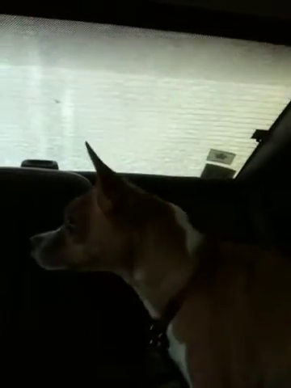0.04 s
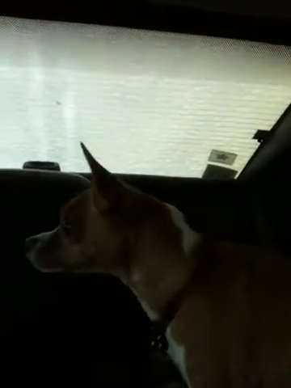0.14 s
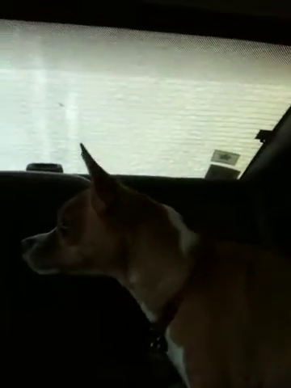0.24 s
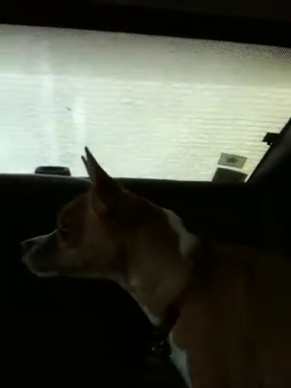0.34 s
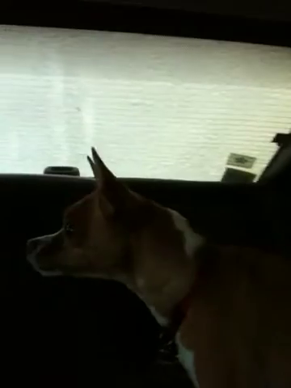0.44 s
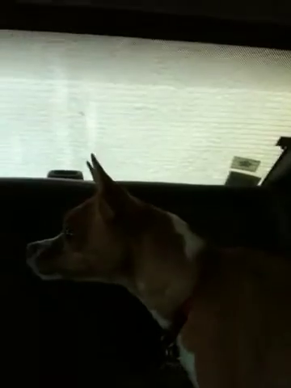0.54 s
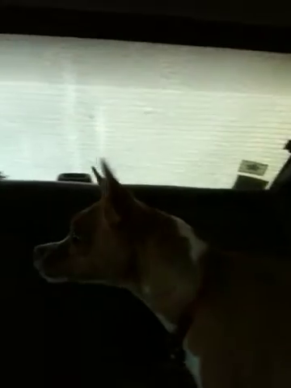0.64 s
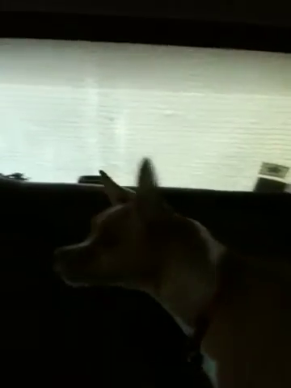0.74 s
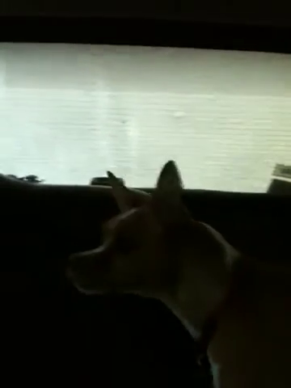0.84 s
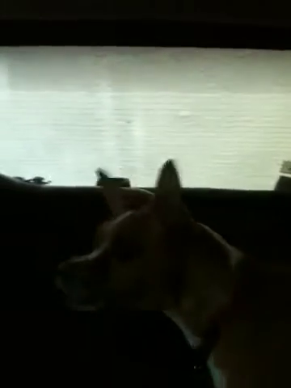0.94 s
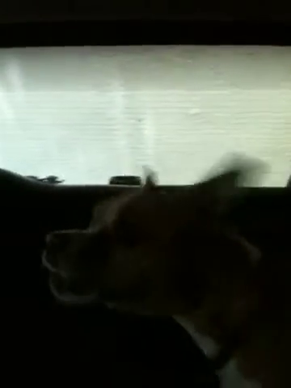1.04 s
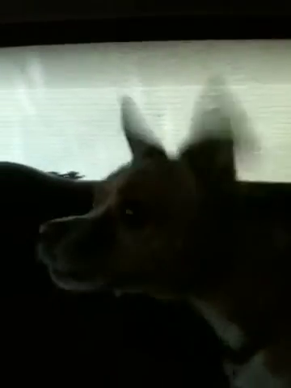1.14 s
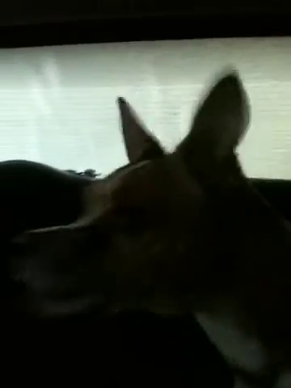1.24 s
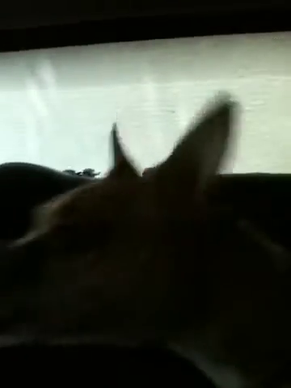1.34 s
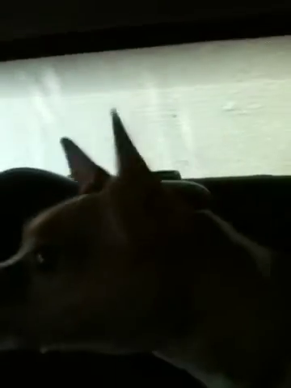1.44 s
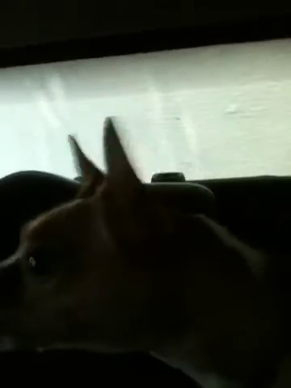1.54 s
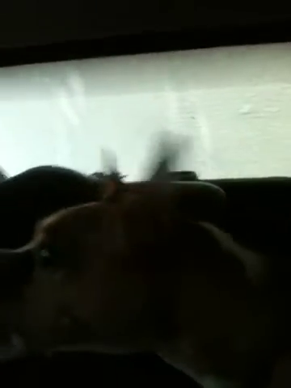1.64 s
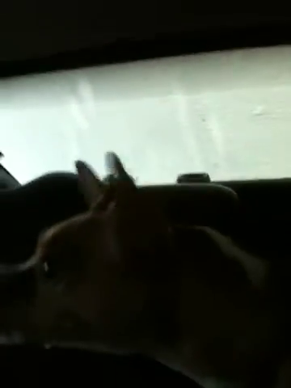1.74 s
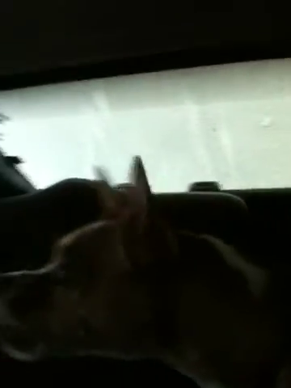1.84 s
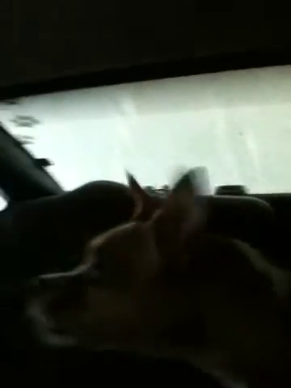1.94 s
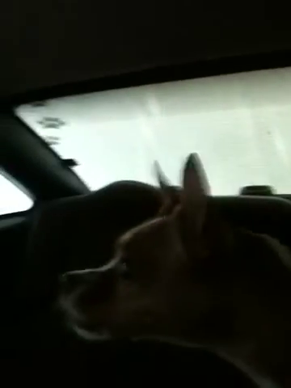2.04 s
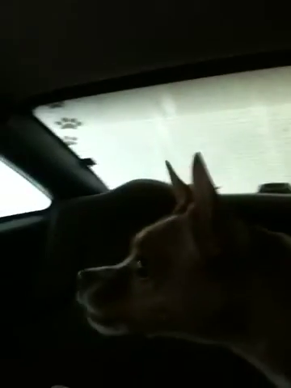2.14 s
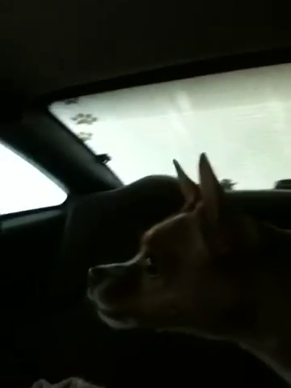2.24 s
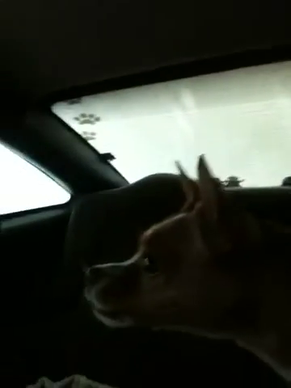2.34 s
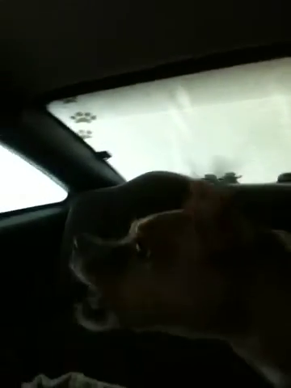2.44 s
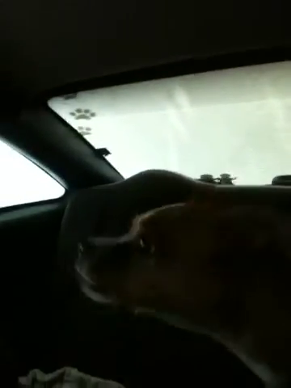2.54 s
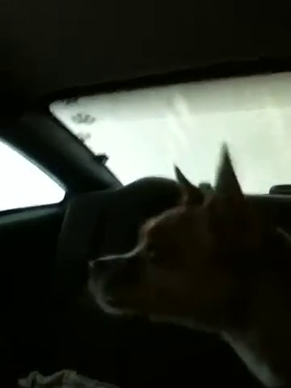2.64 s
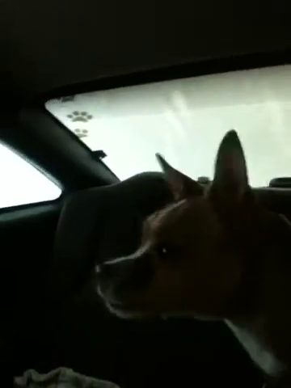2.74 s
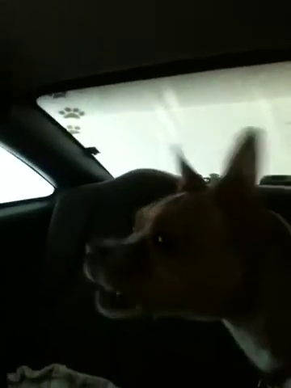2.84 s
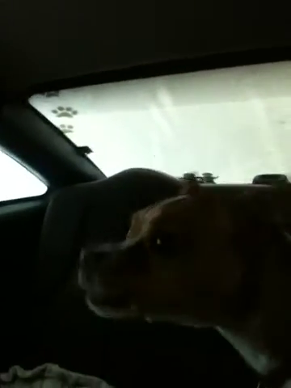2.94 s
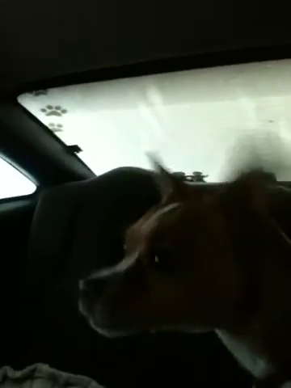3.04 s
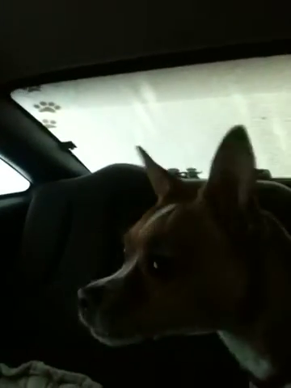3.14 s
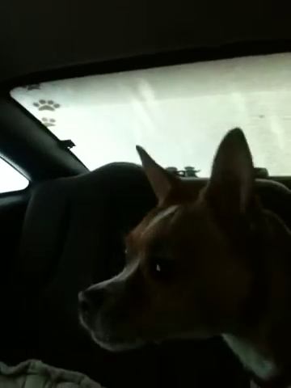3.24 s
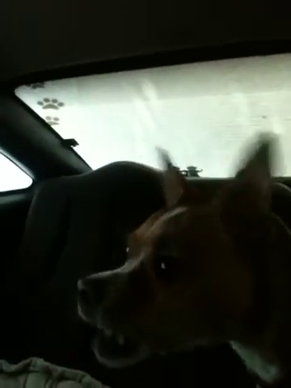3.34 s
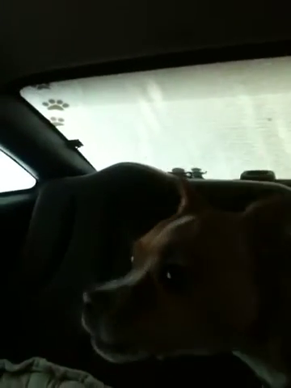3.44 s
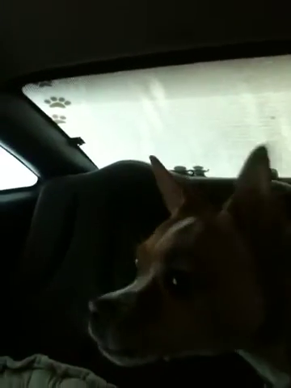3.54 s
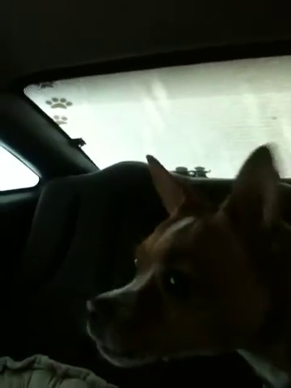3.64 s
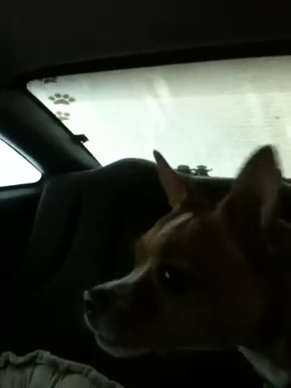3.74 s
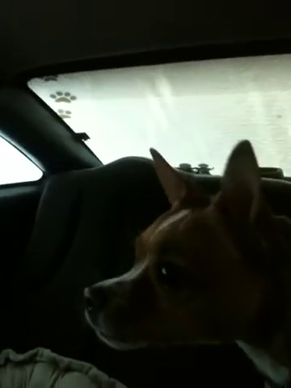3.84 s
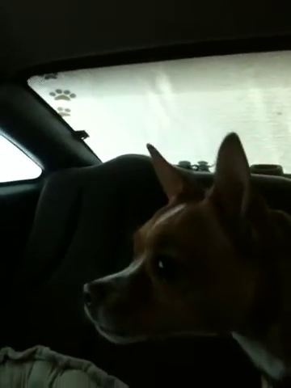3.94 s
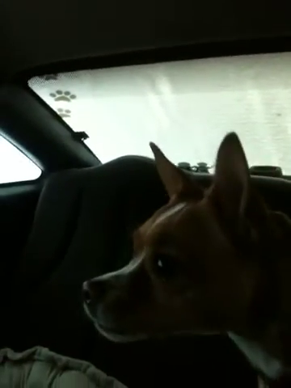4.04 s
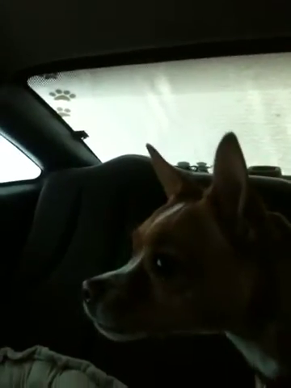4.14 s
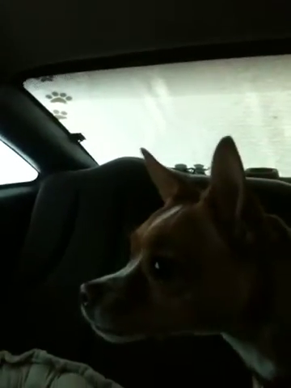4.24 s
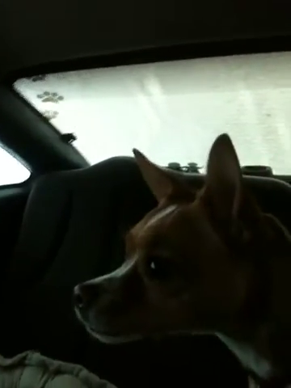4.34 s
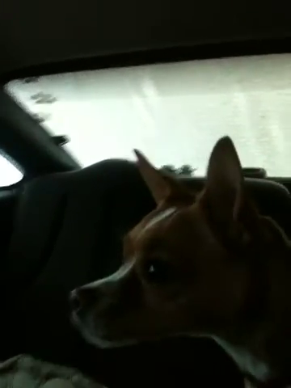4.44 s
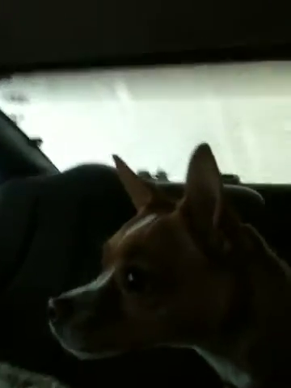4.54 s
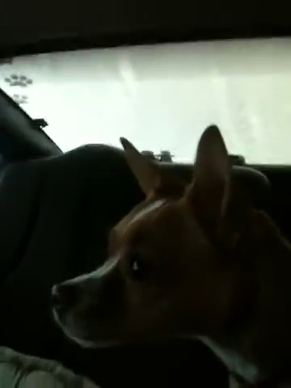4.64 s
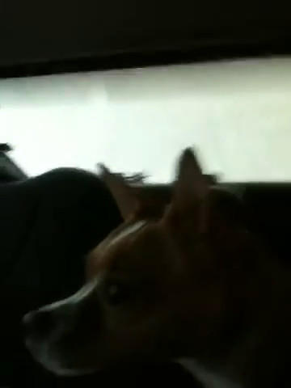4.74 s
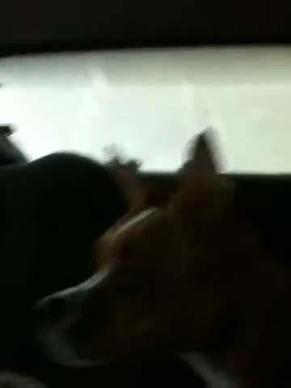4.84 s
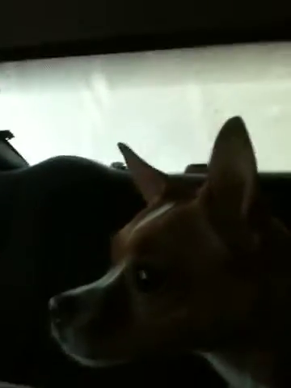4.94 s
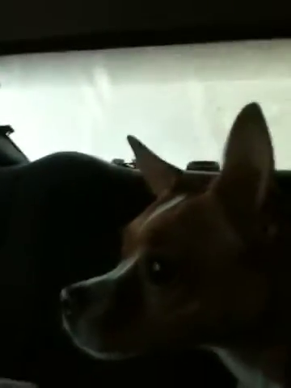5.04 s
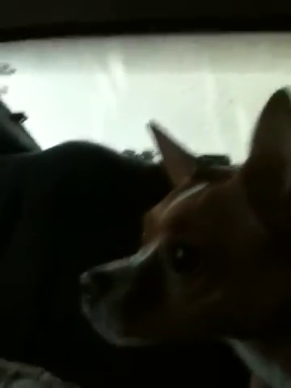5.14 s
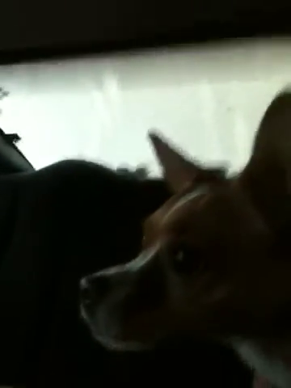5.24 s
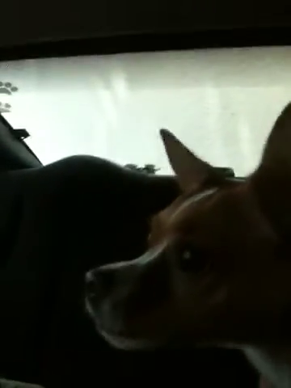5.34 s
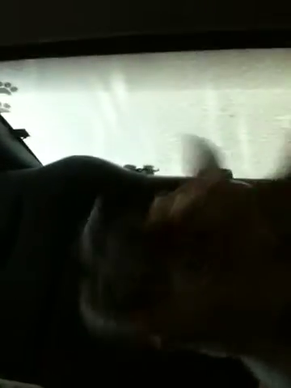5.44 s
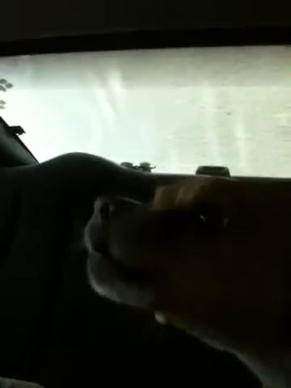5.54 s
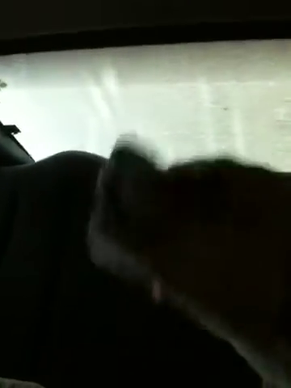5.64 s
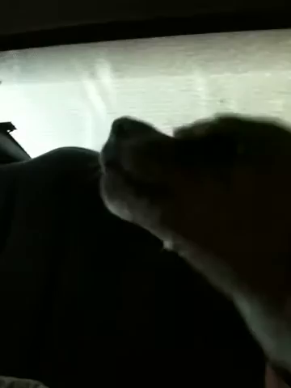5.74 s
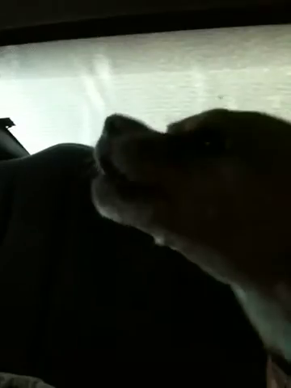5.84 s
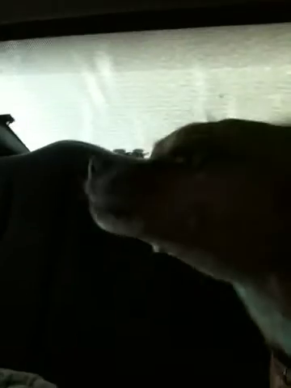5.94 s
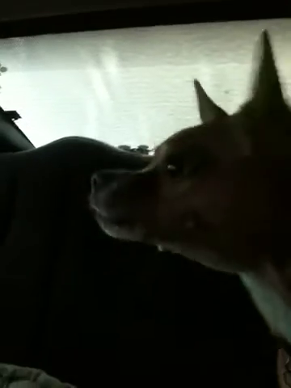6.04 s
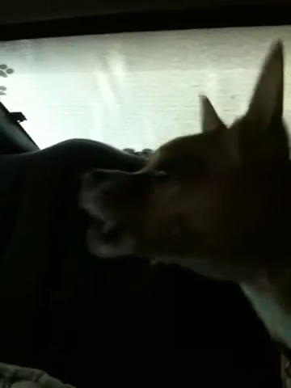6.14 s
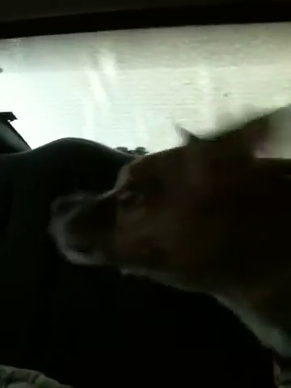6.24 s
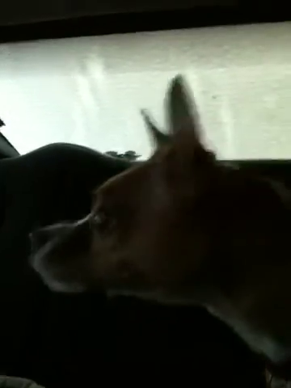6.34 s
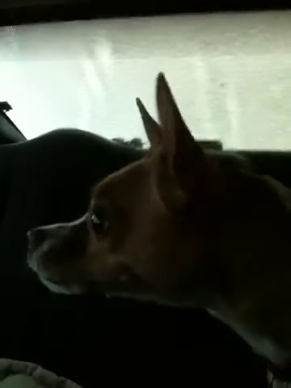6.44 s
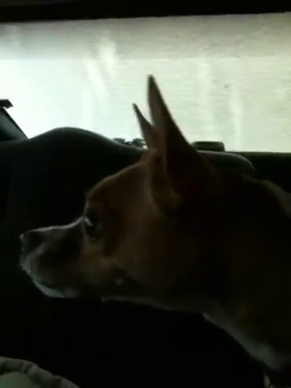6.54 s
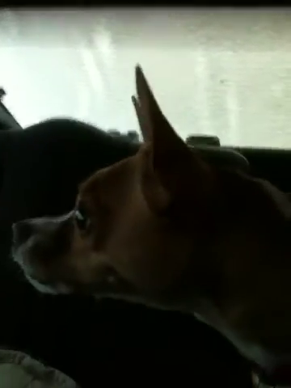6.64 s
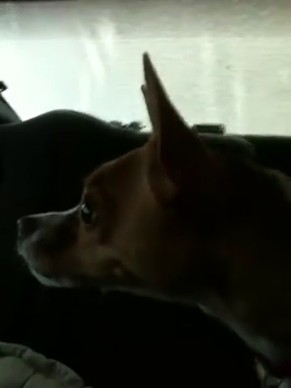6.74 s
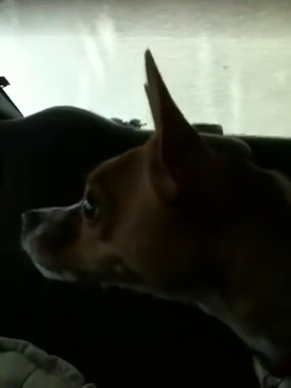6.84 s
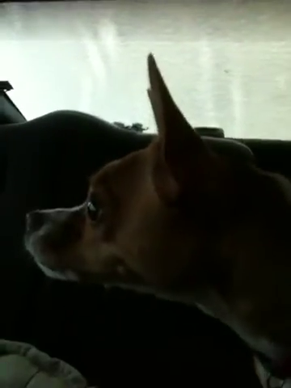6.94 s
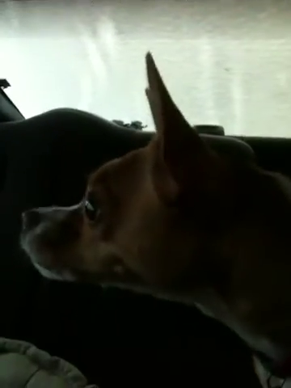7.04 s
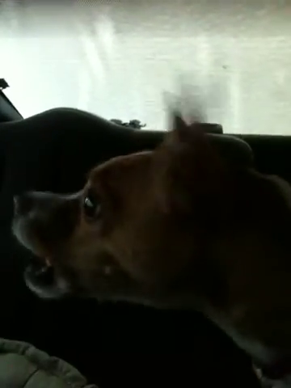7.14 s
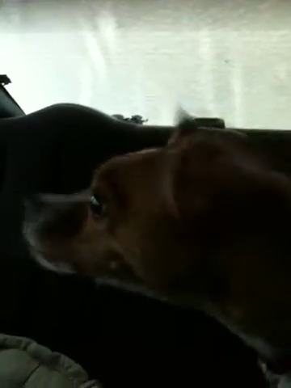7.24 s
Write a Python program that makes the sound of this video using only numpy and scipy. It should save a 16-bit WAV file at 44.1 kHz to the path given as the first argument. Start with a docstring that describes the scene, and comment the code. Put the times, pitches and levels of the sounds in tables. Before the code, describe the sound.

A small dog yaps sharply in quick bursts and growls softly inside a closed car, while car wash water drums and hisses steadily outside.

```python
"""Inside a closed car at a car wash, one phone microphone close to a small dog.
From the start water drums on the body and hisses on the glass (shaped noise), a jet rings the panels
(resonators) and a pump hums (narrow noise). A soft growl (uneven pulses and noise) swells from 0.9 s in bouts.
Yaps come in quick runs from 1 s (gliding partials and rasp), the loud ones overloading the microphone;
from 6.4 s a few small ticks (damped sines) sound near it. Short echoes of glass and seats follow the dog and ticks."""
import sys
import numpy as np
from scipy import signal
from scipy.fft import rfft, irfft
from scipy.io import wavfile
from scipy.ndimage import uniform_filter1d

SR = 44100
rng = np.random.default_rng(int(sys.argv[2]) if len(sys.argv) > 2 else 0)


def output_pcm(signal):
    """Save a mono or channel-first signal as 16-bit PCM at the path in sys.argv[1].

    Samples are clipped to [-1, 1] before scaling.
    """
    pcm = np.clip(np.atleast_2d(signal).T, -1, 1) * 32767
    wavfile.write(sys.argv[1], SR, np.round(pcm).astype(np.int16))


def volts(x):
    """Linear amplitude factor 10**(x/20) for a level x in dB, scalar or array-like."""
    e = np.asarray(x, float) / 20
    return 10 ** e


N = 320607
T = np.arange(N) / SR


def level(x, db):
    """Scale to an rms level."""
    return x * volts(db) / np.sqrt(np.mean(np.abs(x) ** 2))


def band(x, hz, width):
    """Resonance with gain 1 at its centre."""
    return signal.lfilter(*signal.iirpeak(hz, hz / width, fs=SR), x)


def smooth(x, samples):
    """Moving average over a number of samples."""
    return uniform_filter1d(x, size=samples)


def walk(rate):
    """Random levels held 1 / rate s and smoothed twice; spread about 1."""
    hold = int(SR / rate)
    steps = np.repeat(rng.standard_normal(N // hold + 1), hold)
    return level(smooth(smooth(steps, hold), hold)[:N], 0)


def coloured(points):
    """Noise with a spectrum of (f/Hz, level/dB) points, joined along log frequency."""
    hz, db = np.transpose(points)
    bins = np.log(np.fft.rfftfreq(N, 1 / SR) + 1)
    gain = volts(np.interp(bins, np.log(hz), db, left=-80, right=-80))
    return irfft(rfft(rng.standard_normal(N)) * gain, N)


def rung(x, modes):
    """x through parallel resonances (f/Hz, width/Hz, level/dB) of alternating sign, rms 1."""
    return level(sum((-1) ** k * volts(db) * band(x, f, w) for k, (f, w, db) in enumerate(modes)), 0)


# water outside, mean course: (t/s, drumming level/dB, spray level/dB)
WATER_COURSE = [(0.0, -43, -51.5), (.64, -45.5, -47.5), (.9, -43.5, -46), (2.2, -44.5, -50.5),
                (4.1, -42.5, -53), (4.68, -43.5, -49.5), (5.35, -45, -51), (6.75, -43.5, -50),
                (7.2, -44, -54.5)]
# spectrum of the drumming on the body: (f/Hz, relative level/dB)
DRUMMING_SPECTRUM = [(35, -46.5), (60, -47), (91, -16.5), (129, -3), (184, 2), (232, -5.5), (271, -3.5),
                     (414, -34.5), (439, -14.5), (1000, -21), (1300, -24.5), (2200, -120)]
# spectrum of the spray on the glass: (f/Hz, relative level/dB)
SPRAY_SPECTRUM = [(470, -32.5), (800, -24), (966, -17), (1060, -8.5), (1370, -4), (1750, -2), (2360, -6.5),
                  (4330, -8.5), (8760, -10.5), (16200, -33)]


def water():
    """Many drop impacts merge into noise: a swaying rumble on the body and a steadier hiss on the glass."""
    s, drum_db, spray_db = np.transpose(WATER_COURSE)
    drum_sway_db, spray_sway_db = 1.2, 0.38
    drum = level(coloured(DRUMMING_SPECTRUM), 0)
    drum = drum * volts(np.interp(T, s, drum_db) + drum_sway_db * walk(27))
    spray = level(coloured(SPRAY_SPECTRUM), 0)
    spray = spray * volts(np.interp(T, s, spray_db) + spray_sway_db * walk(34))
    return drum + spray


# the jet sweeping the panels: (t/s, near-panel level/dB, far-panel level/dB)
JET_COURSE = [(0, -51.5, -64.5), (.5, -53.5, -73), (0.902, -51, -65.5), (2.299, -48.5, -67),
              (4.4, -51, -65), (4.7, -64, -54), (7.2, -63.5, -52)]
# resonances of the near panel: (f/Hz, width/Hz, relative level/dB)
NEAR_MODES = [(700, 80, -3.5), (1540, 210, 4.5), (4120, 170, -2.5), (10300, 5100, -8.5)]
# resonances of the far panel: (f/Hz, width/Hz, relative level/dB)
FAR_MODES = [(2300, 370, 3), (9700, 8600, -8)]


def jet():
    """Broad jet noise rings the resonances of two panels, each with its own course of levels."""
    s, near_db, far_db = np.transpose(JET_COURSE)
    sound = 0
    for modes, db in ((NEAR_MODES, near_db), (FAR_MODES, far_db)):
        noise = band(rng.standard_normal(N), 4100, 14000)
        sound = sound + rung(noise, modes) * volts(np.interp(T, s, db))
    return sound


def pump():
    """Noise through two equal narrow resonances makes an unsteady low hum."""
    hz, width_hz, db = 53, 9, -55
    return level(band(band(rng.standard_normal(N), hz, width_hz), hz, width_hz), db)


# bouts of growling, before flutter: (from t/s, to t/s, level at start/dB, level at end/dB)
GROWL_BOUTS = [(.93, 1.89, -37.5, -27.5), (2.46, 3.96, -35, -36), (5.4, 5.5, -44, -45),
               (5.974, 6.605, -37, -41), (7.145, 7.4, -43, -25), (4.95, 5.15, -48, -46)]
# resonances of the almost closed muzzle: (f/Hz, width of each of two passes/Hz, relative level/dB)
MUZZLE_MODES = [(208, 11, -3), (365, 250, 6.5), (534, 160, -0.5), (1250, 83, -3.5), (1500, 290, -12.5),
                (4340, 100, -23)]


def growl():
    """Slow uneven fold beats and breath noise behind an almost closed muzzle, in bouts over a faint rest."""
    beat_hz, rest_db = 176.7, -52.5
    onset_s, fade_s = 0.029, 0.1  # a growl dies slower than it starts
    turns = np.cumsum(beat_hz * (1 + .05 * walk(5.2) + .05 * walk(150))) / SR
    beats = np.diff(np.floor(turns), prepend=0) * volts(3.0 * walk(120))
    source = level(beats, 0) + .7 * rng.standard_normal(N)
    sound = sum(volts(db) * level(band(band(source, f, w), f, w), 0) for f, w, db in MUZZLE_MODES)
    db = rest_db
    for start, stop, start_db, end_db in GROWL_BOUTS:
        corners = [start - onset_s, start, stop, stop + fade_s]
        db = db + np.interp(T, corners, [0, start_db - rest_db, end_db - rest_db, 0])
    flutter_db = 2.1 * walk(18)
    return level(sound, 0) * volts(db + flutter_db)


def hill(at, f, w, db):
    """Resonance gain at a gliding frequency; about 7 dB down half of w from the centre."""
    return volts(db) / (1 + (2 * (at - f) / w) ** 2) ** 1.178


# resonances common to all yaps: (f/Hz, width/Hz, level/dB)
TRACT_MODES = [(580, 285, -7.5), (800, 268, 0), (1316, 234, -0.5), (1507, 290, -1), (2136, 210, -6),
               (2650, 210, -8.5), (4234, 520, -13)]
# resonances colouring the upper partials: (f/Hz, width/Hz, relative level/dB)
MOUTH_MODES = [(2750, 640, 6.5), (3560, 660, 3), (4590, 470, -4.5), (8770, 1600, -5.5)]


def tract_gain(at, multiple, mouth_hz, mouth_db, upper_db):
    """Throat and mouth resonances weight a partial wherever its frequency glides."""
    mouth_width_hz, floor_db = 365, -30
    gain = sum(hill(at, *mode) for mode in TRACT_MODES)
    gain = gain + hill(at, mouth_hz, mouth_width_hz, mouth_db)
    gain = gain + volts(upper_db) * sum(hill(at, *mode) for mode in MOUTH_MODES)
    return gain + volts(floor_db) / max(1, multiple) ** 2


# spells in which every second beat is weaker: (from t/s, to t/s, half-pitch lines level/dB)
HALVING_SPELLS = [(1.02, 1.109, -1.5), (1.389, 1.434, -6.5), (1.636, 1.7, -5.5), (2.48, 2.591, -4.5),
                  (2.947, 2.998, -0.5), (3.37, 3.459, -16.5), (3.738, 3.775, -5.5), (3.818, 3.844, -4),
                  (5.598, 5.666, -4), (5.678, 5.799, -9), (5.898, 5.984, -3), (6.196, 6.23, -5),
                  (7.207, 7.3, 0.5)]


def halving():
    """Weaker second beats give lines halfway between the partials; returns their level in dB."""
    even_db = -38  # outside the spells
    rise = sum((db - even_db) * ((T > start) & (T < stop)) for start, stop, db in HALVING_SPELLS)
    return even_db + smooth(rise, 500)


# throat resonances rung by leaking air: (f/Hz, width/Hz, relative level/dB)
THROAT_MODES = [(740, 72, -1.5), (1490, 1070, 8.5), (2550, 280, 14.5), (4400, 2700, -4)]


def rasp(rough, phase, slack_db):
    """The rougher the voice, the more air leaks once a beat and rings the throat."""
    air = rng.standard_normal(N) * (1 + 0.47 * np.cos(phase))
    fade_db = 0.5 * slack_db  # added to the fade of the effort itself
    return 1.6 * rough * volts(fade_db) * rung(air, THROAT_MODES)


# one curve for each yap: (t/s, pitch before jitter f/Hz, lung effort level/dB,
# mouth opening as tilt of the partials/dB per octave)
YAP_CURVES = [
    [(1.0, 557, -53, -17), (1.03, 654.4, -22.5, -5), (1.054, 773.4, -8.5, -1), (1.086, 863.6, -4, 0),
     (1.135, 900, -3, 1.5), (1.19, 705.6, -7.5, -3.5), (1.208, 665, -22, -3), (1.235, 590, -38, -6)],
    [(1.29, 535, -43, -5), (1.315, 607, -16, -6.5), (1.35, 683.3, -11.5, -1.5), (1.384, 870.6, -5, 2),
     (1.415, 1050, -3, 0.5), (1.455, 736.6, -2.5, -1), (1.475, 601, -9.5, -11.5), (1.5, 516.6, -29.5, -4)],
    [(1.59, 544, -35, -4), (1.622, 603.3, -24, -15.5), (1.655, 662.7, -9, -6), (1.698, 883, -4, -0.5),
     (1.725, 952, -2.5, 1), (1.786, 672, -6, -2.5), (1.805, 620, -16.5, -11.5), (1.83, 575, -30, -7)],
    [(1.87, 552.5, -30, -9), (1.9, 620, -13.5, -12), (1.92, 667, -6, -4), (1.974, 845, -4.5, 0),
     (1.996, 835, -6.5, -1.5), (2.02, 581, -14.5, -0.5), (2.05, 462, -45, -9)],
    [(2.44, 512.7, -55, -9), (2.47, 716, -23, -6.5), (2.495, 816, -9.5, -1), (2.53, 870, -1, 0),
     (2.545, 1329, -4, -3), (2.575, 1068, -2, -2), (2.6, 827, -3, -4.5), (2.626, 764, -16, -4.5),
     (2.65, 592, -39, 1)],
    [(2.87, 527.7, -45, -9), (2.898, 748, -17, -3.5), (2.915, 780, -4, -1), (2.942, 830, -2, 0),
     (2.955, 1070, -4, 1), (2.985, 1083, -4.5, 1), (3.018, 770, -0.5, -1.5), (3.046, 600, -20, -3),
     (3.07, 504, -31.5, -5)],
    [(3.35, 488, -38.5, -12), (3.384, 740, -15.5, -2.5), (3.415, 814, -5.5, 1.5), (3.45, 1015, 0.5, -1),
     (3.483, 889, 0, -2.5), (3.505, 701.5, -1.5, -2.5), (3.537, 534, -20.5, -7), (3.56, 512.5, -34, -6)],
    [(3.7, 434, -50, -6), (3.73, 538, -22.5, -7), (3.758, 600, -15, -4.5), (3.785, 640, -9.5, -2.5),
     (3.809, 562, -13, -7.5), (3.83, 509, -22.5, -3.5), (3.86, 496, -45, -15)],
    [(5.485, 746, -48.5, -8), (5.511, 800, -3.5, -5.5), (5.531, 858.5, 0, 0.5), (5.54, 1346, 0.5, 0.5),
     (5.6, 1251, -1, 4), (5.624, 1051, -6, 0), (5.655, 879, -17, 0)],
    [(5.656, 890, -19, 4), (5.675, 987, 4, -7), (5.69, 1096, -0.5, -7), (5.741, 1173, -2.5, 3),
     (5.785, 1063, 3, -2.5), (5.815, 873, -16.5, 2), (5.845, 750.5, -19, -4)],
    [(5.846, 749, -21, -3), (5.881, 821, -10.5, -4), (5.901, 854, -14.5, 0), (5.95, 956.4, -14.5, 0),
     (5.99, 811, -15, -0.5), (6.03, 548, -14, -15), (6.05, 495, -31, -12)],
    [(6.15, 474, -33, -14), (6.182, 656, -17.5, -12.5), (6.214, 830, -9, -2), (6.236, 830, -8.5, 1),
     (6.26, 884, -3, -0.5), (6.3, 768, -5.5, -1.5), (6.324, 650, -17, -7), (6.35, 518, -30, -12)],
    [(7.16, 587, -50, -15), (7.19, 819, -13.5, -4), (7.214, 959, -6.5, -0.5), (7.24, 1191, -8.5, 1),
     (7.28, 1160, -1, -1.5)],
]
# uneven beating of the vocal folds in each yap, at full effort:
# (roughness 0-1 at first, t/s of the change, roughness after it)
YAP_ROUGHNESS = [(.6, 1.135, .42), (.48, 1.395, .17), (.38, 1.715, .17), (.15, 1.915, .03),
                 (.72, 2.58, .22), (.38, 2.95, .14), (.4, 3.44, .14), (.08, 3.755, .02), (.27, 5.63, .2),
                 (.17, 5.7, .02), (.01, 5.9, .24), (.35, 6.25, .1), (.3, 7.238, .03)]
# shape of mouth and throat in each yap:
# (mouth resonance f/Hz, its level/dB, first partial level/dB, upper partials level/dB at full effort)
YAP_MANNER = [(1800, 5, -7, -19), (1940, -2, -1.5, -13), (1715.3, -7, 2, -13), (1690, -18, 5, -8.5),
              (1630, 5, 1.5, -8.5), (2653, -7.5, 0.5, -8.5), (2001, -0.5, 1.5, -13), (1380, 4, 3, -14.5),
              (2580, -0.5, -4, -23), (2322, 5.5, -2.5, -26), (1520, 6, 0, -3.5), (1750, 3.5, -2, -7),
              (1870, 5, 3.5, -4.5)]


def yaps():
    """Partials of a gliding pitch, coloured by throat and mouth and smeared by uneven beats, with rasp."""
    s, hz, db, tilt_db = np.transpose(np.vstack(YAP_CURVES))
    which = (np.searchsorted([yap[0][0] for yap in YAP_CURVES], T) - 1).clip(0)
    manner = [smooth(1. * column[which], 700) for column in np.transpose(YAP_MANNER)]
    mouth_hz, mouth_db, first_db, upper_db = manner
    spans = sum((T >= yap[0][0]) & (T <= yap[-1][0] + .002) for yap in YAP_CURVES)
    sounding = smooth(1. * spans.clip(0, 1), 900)
    effort_db = smooth(np.interp(T, s, db), 300)
    slack_db = np.minimum(effort_db, 0)
    tilt = np.interp(T, s, tilt_db)

    early, change_s, late = np.transpose(YAP_ROUGHNESS)[:, which]
    rough = smooth(np.where(T < change_s, early, late), 900)
    # from -12 down to -22 dB of effort the roughness sinks to a share of .65
    rough = rough * np.interp(effort_db, (-22, -12), (.65, 1))
    jitter = rough * (.03 * walk(70) + .045 * walk(400))
    pitch = smooth(np.interp(T, s, hz), 600) * (1 + jitter)
    phase = 2 * np.pi * np.cumsum(pitch) / SR

    upper_db = upper_db + 0.54 * slack_db  # upper partials fade faster than the effort
    half_db = halving()
    lowest_db = -7.5  # the line at half the pitch radiates less
    patchy_db, patchy_per_s = 3, 40  # each partial swells and sinks on its own
    voice = 0
    for multiple in np.arange(.5, 12, .5):
        gain = tract_gain(multiple * pitch, multiple, mouth_hz, mouth_db, upper_db)
        if multiple == 1:
            gain = gain * volts(first_db)
        elif multiple % 1:
            gain = gain * volts(half_db + lowest_db * (multiple < 1))
        gain = gain * volts(tilt * np.log2(max(1, multiple)) + patchy_db * walk(patchy_per_s))
        # high partials blur first
        smear = 1 - (1 - rough) ** max(1, multiple / 2) * (1 - .085 * max(0, multiple - 3))
        wobble = np.sqrt(1 - smear) + np.sqrt(smear / 2) * (walk(550) + 1j * walk(550))
        turning = np.exp(1j * (multiple * phase + 1.3 * multiple ** 2))
        voice = voice + gain * np.real(wobble * turning)
    bark = sounding * volts(effort_db) * (voice + rasp(rough, phase, slack_db))
    return signal.sosfilt(signal.butter(2, 260, "high", fs=SR, output="sos"), bark)


# small ticks near the microphone: (t/s, level of the starting envelope/dB, ring f/Hz)
TICK_RINGS = [(6.437, -26, 2170), (6.452, -31, 2300), (6.494, -38, 9040), (6.587, -49, 7800),
              (6.675, -37, 8460)]


def ticks():
    """Short rings, each a sine dying away with a time constant of 2.5 ms."""
    out, t = np.zeros(N), T[:600]
    for s, db, hz in TICK_RINGS:
        i = int(s * SR)
        out[i:i + 600] += volts(db) * np.exp(-t / 0.0025) * np.sin(2 * np.pi * hz * t)
    return out


# echoes of glass and seats: (delay t/s, level/dB relative to the direct sound)
CABIN_ECHOES = [(.0021, -37.5), (.0037, -23), (.0059, -10.5), (.0083, -20.5), (.0127, -18.5),
                (.0181, -25.5)]


def cabin(sound):
    """Adds short reflections of alternating sign to the direct sound."""
    echoes = np.zeros(1200)
    echoes[0] = 1
    for k, (s, db) in enumerate(CABIN_ECHOES):
        echoes[int(s * SR)] = (-1) ** k * volts(db)
    return signal.fftconvolve(sound, echoes)[:N]


def scene():
    """Car wash outside, dog and ticks with cabin echoes inside, alike in both channels."""
    wash = water() + jet() + pump()
    inside = cabin(growl() + yaps() + ticks())
    return np.tile(inside + wash, (2, 1))


def low_pass(x):
    """Removes everything above the highest recorded frequency."""
    return signal.sosfilt(signal.butter(12, 16380, fs=SR, output="sos"), x)


def record(dry):
    """One microphone: it saturates a little unevenly, then the treble is lifted and the bass cut."""
    overload, knee, lopsided = .68, 3.2, .011  # ceiling (full scale 1), sharpness of bend, unevenness
    bass_cut_hz = 120
    bent = dry + lopsided * np.abs(dry)
    flat = bent / (1 + np.abs(bent / overload) ** knee) ** (1 / knee)
    lifted = flat + 0.16 * band(flat, 11000, 6300)
    mix = signal.sosfilt(signal.butter(1, bass_cut_hz, "high", fs=SR, output="sos"), lifted)
    return low_pass(mix)


dry = scene()
out = record(dry)
output_pcm(out)
```